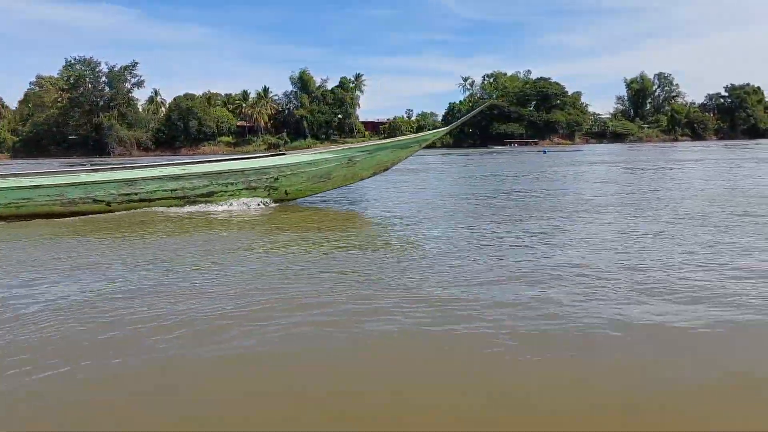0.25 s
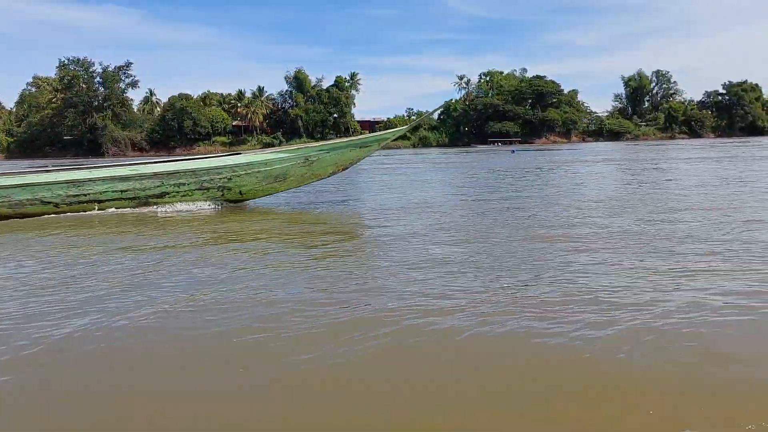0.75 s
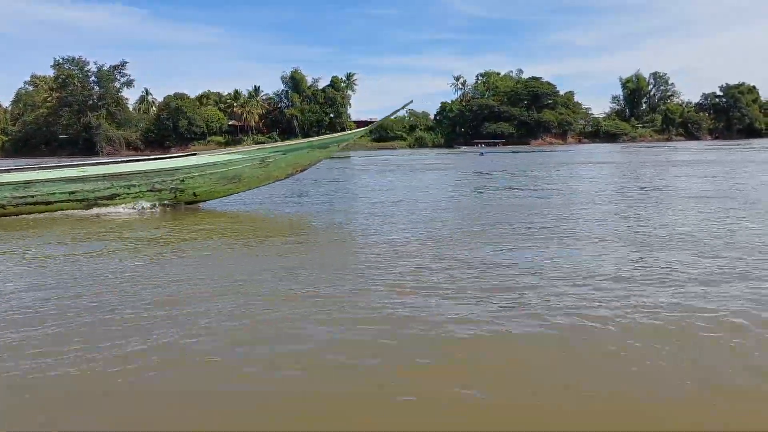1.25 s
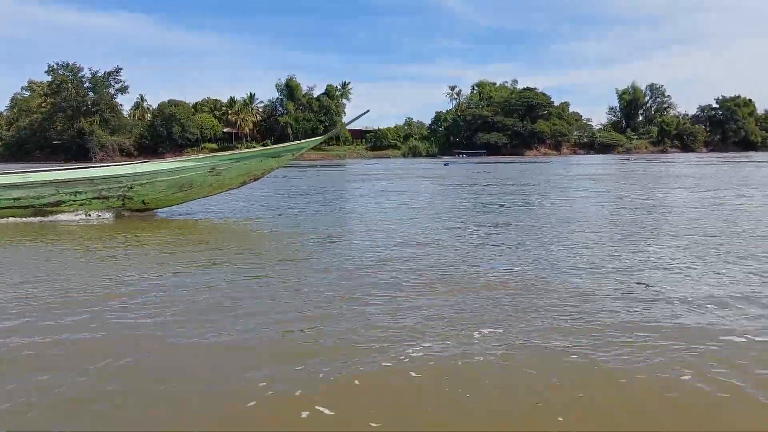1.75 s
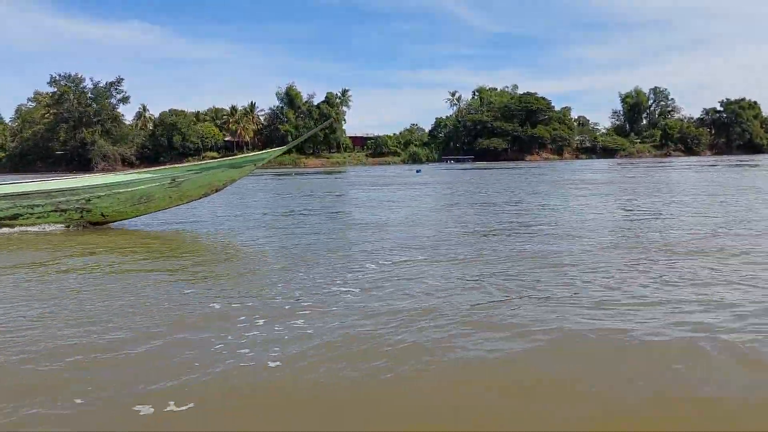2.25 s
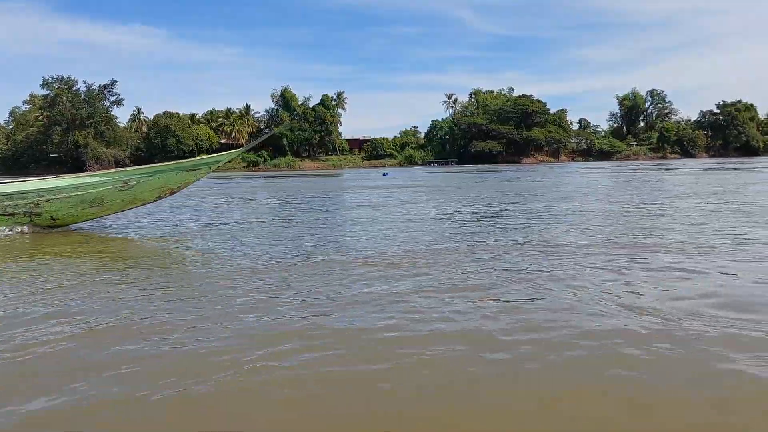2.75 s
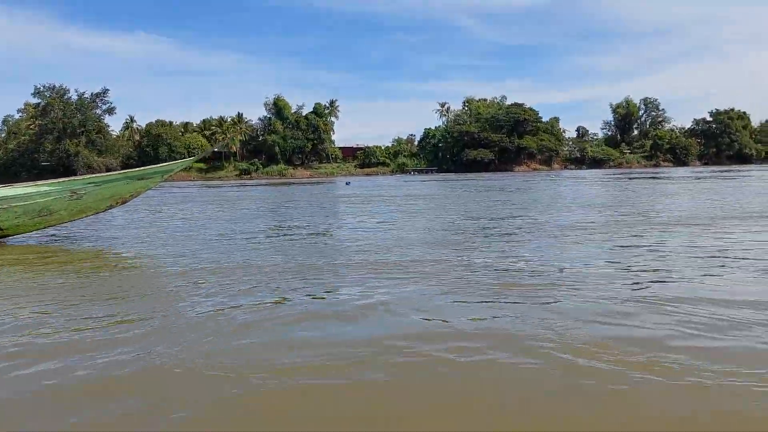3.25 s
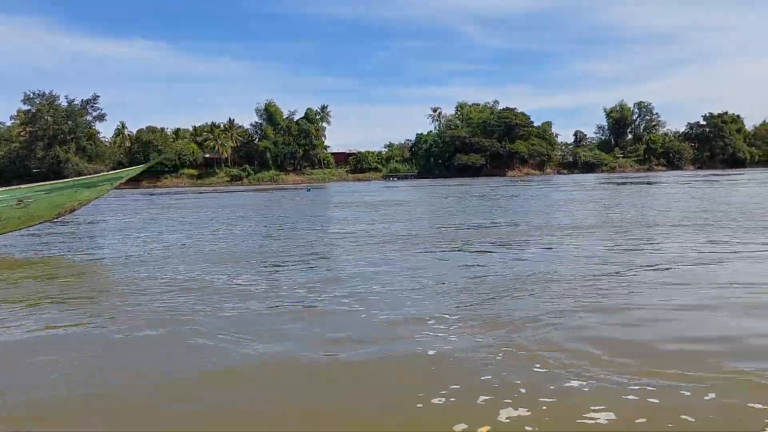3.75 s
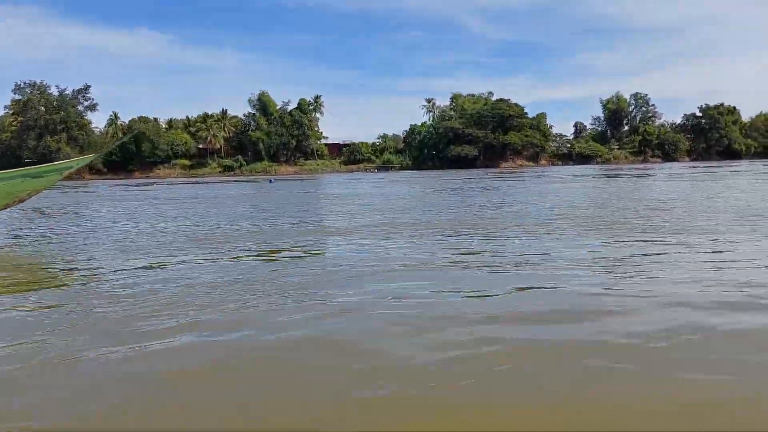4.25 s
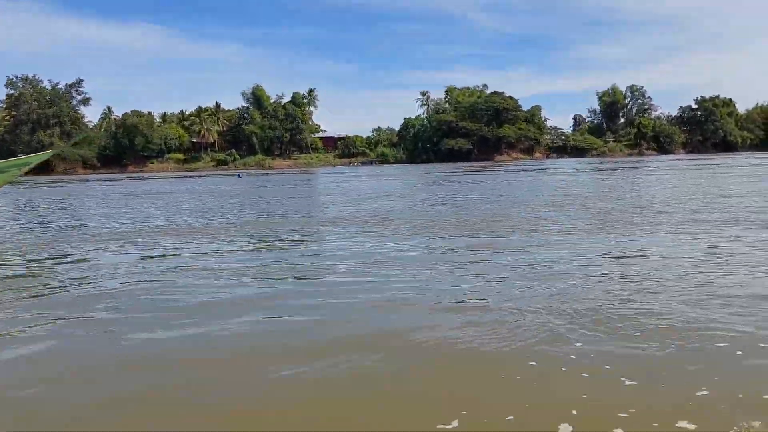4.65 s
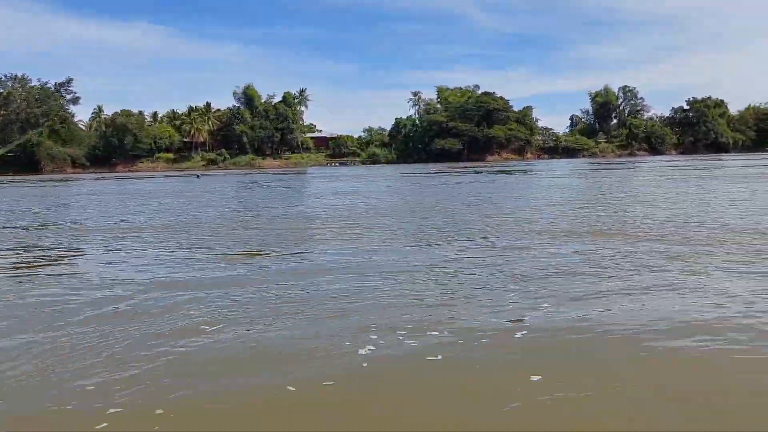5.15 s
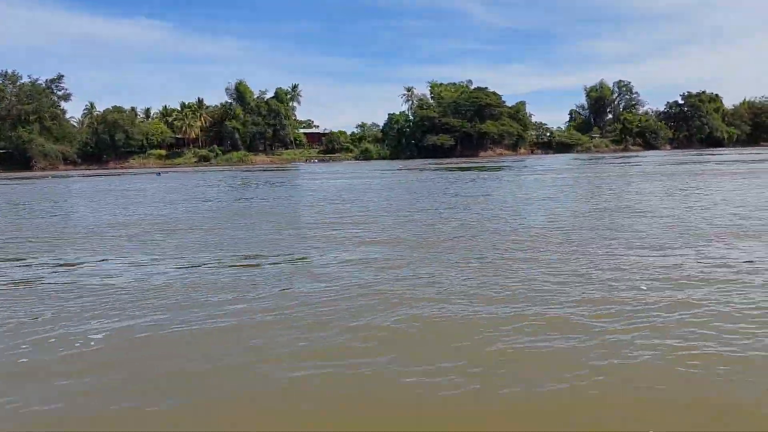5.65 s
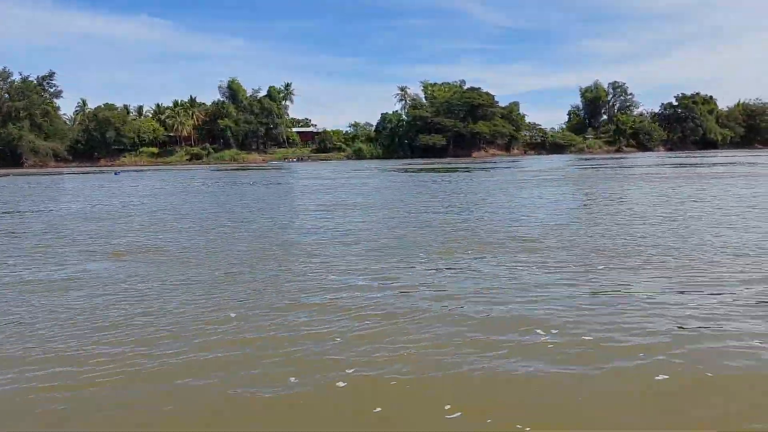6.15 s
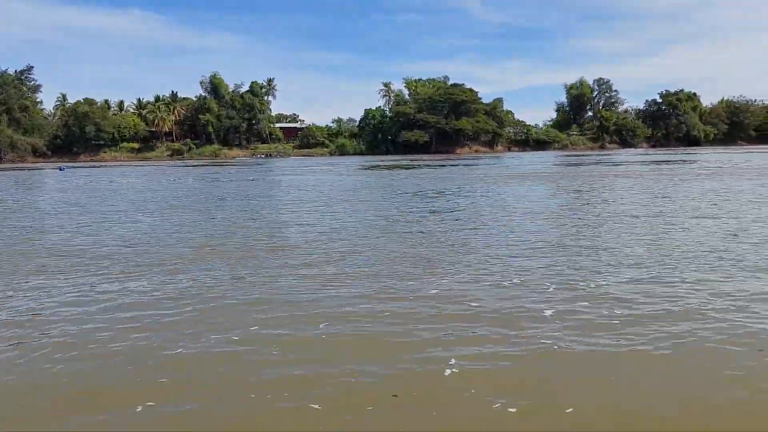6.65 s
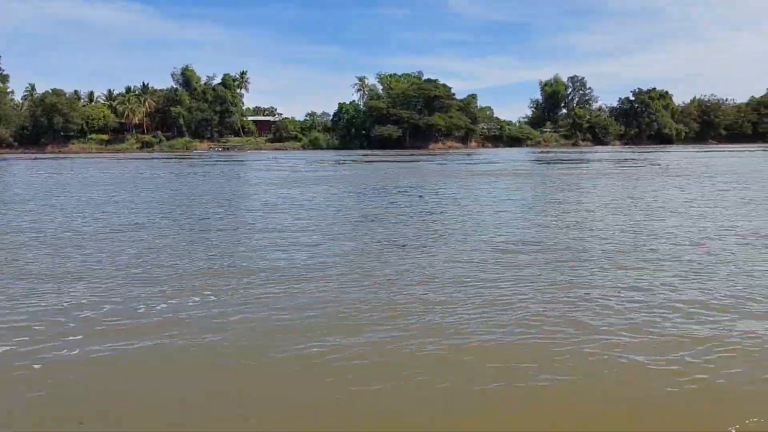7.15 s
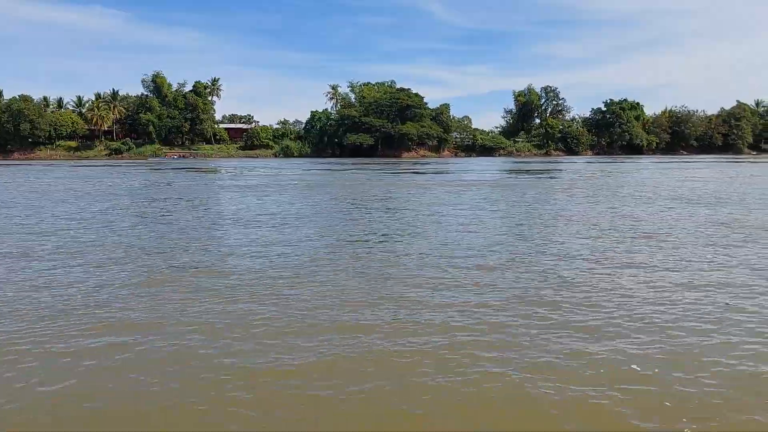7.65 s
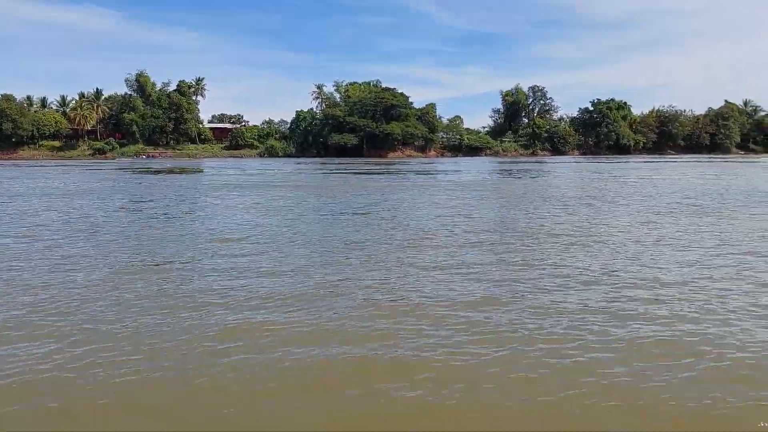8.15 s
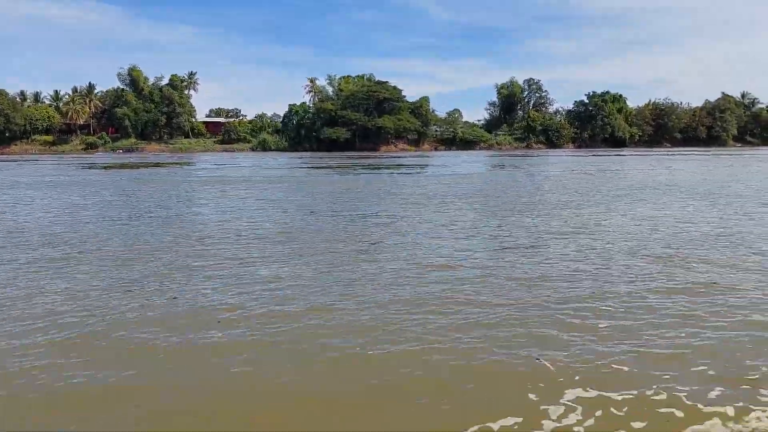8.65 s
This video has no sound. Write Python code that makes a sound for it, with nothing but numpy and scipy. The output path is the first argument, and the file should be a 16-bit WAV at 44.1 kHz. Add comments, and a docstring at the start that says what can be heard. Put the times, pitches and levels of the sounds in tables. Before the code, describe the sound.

For about 9 seconds a small boat engine runs at constant throttle, heard from on board on an open river. A deep, steady exhaust drone, strongest around 84 Hz with higher buzzing overtones, barely wavers. Rapid, slightly uneven piston and valve knocks give a woody, metallic clatter; loose steel rings around 2 kHz, with smaller fittings jingling higher. The rattle flares briefly, as near 1.1, 2.5, 3.75, 5.6 and 7.7 seconds, and drops for instants between. A hiss pulses with the engine, and smooth water wash runs along the hull throughout. Wind buffets the right microphone with low soft thumps: near 0.1, 0.8 and 1.5 seconds, then repeatedly from 3 to 5.2, with a weaker one around 6. After 7 the wind is light, leaving drone, rattle and wash continuing unchanged to the end.

```python
"""A long-tail boat engine runs at constant throttle on a wide river, heard from on board.
Its exhaust drones as sines on crankshaft orders; its contacts are clicks and grit that excite the knock
of the block and casing and the rattle of loose steel, and pulsing noise hisses in the same rhythm.
Shaped noise washes along the hull. The boat reaches the left microphone port first;
lumpy noise and short gusts of headwind buffet the right one."""
import sys
import numpy as np
from scipy import signal
from scipy.fft import rfft, irfft, next_fast_len
from scipy.io import wavfile
from scipy.ndimage import map_coordinates

SR = 44100
rng = np.random.default_rng(int(sys.argv[2]) if len(sys.argv) > 2 else 0)


def generate_wav(signal):
    """Clip the signal to [-1, 1] and save it as 16-bit WAV at the path in sys.argv[1]."""
    frames = np.transpose(np.atleast_2d(signal))
    scaled = np.clip(frames, -1, 1) * 32767
    pcm = np.round(scaled).astype(np.int16)
    wavfile.write(sys.argv[1], SR, pcm)


N = 392490  # length [samples]


def amp(db):
    """Decibels to gain."""
    return 10 ** (np.asarray(db) / 20)


def unit(x):
    """Scale to rms 1."""
    return x / np.sqrt(np.mean(x ** 2) + 1e-20)


def along(points, hz):
    """Read a (frequency [Hz], value) table on a log frequency axis."""
    table_hz, values = np.transpose(points)
    return np.interp(np.log(hz + 1), np.log(table_hz + 1), values)


def over_time(rows):
    """Read a (time [s], value) table at every sample."""
    time_s, values = np.transpose(rows)
    return np.interp(np.arange(N) / SR, time_s, values)


def wobble(rate):
    """A smooth random curve through `rate` random knots a second."""
    knots = rng.standard_normal(int(N * rate / SR) + 4)
    coarse = np.arange(0, N, 32)  # a smooth curve needs only every 32nd sample
    curve = map_coordinates(knots, [coarse * rate / SR + 1])
    return np.interp(np.arange(N), coarse, curve)


def swell(s, width_s):
    """A bell-shaped rise and fall peaking at 1 at time s, down to 1/e^2 width_s away."""
    return np.exp(-2 * ((np.arange(N) / SR - s) / width_s) ** 2)


def filtered(x, response):
    """Multiply the spectrum of x by a response, a function of frequency [Hz]."""
    size = next_fast_len(N + SR // 2)
    hz = np.fft.rfftfreq(size, 1 / SR)
    return irfft(rfft(x, size) * response(hz), size)[..., :N]


def coloured(x, spectrum):
    """Equalize x with a (frequency [Hz], level [dB]) table, at rms 1."""
    return unit(filtered(x, lambda hz: amp(along(spectrum, hz))))


def ringing(x, modes, shift_db):
    """Ring a bank of resonances, at rms 1; the point of contact wanders, so their shares keep shifting."""
    out = np.zeros_like(x)
    for k, (hz, width_hz, db) in enumerate(modes):
        b, a = signal.iirpeak(hz, hz / width_hz, SR)
        drive = x * amp(db + shift_db * np.tanh(wobble(35)))
        out += (-1) ** k * signal.lfilter(b, a, drive)  # neighbours in opposite polarity
    return unit(out)


# likeness of the two ports: (frequency [Hz], left-right correlation [0-1])
PORT_LIKENESS = [(60, 0.6), (300, 0.86), (800, 0.73), (2100, 0.73), (3000, .5), (4200, 0), (6000, 0),
                 (15000, 0.5)]


def spread(direct, scattered):
    """Both ports share the direct sound; the scattered part, opposite in each, sets them apart."""
    def angle(hz):
        return np.arccos(np.clip(along(PORT_LIKENESS, hz), 0, 1)) / 2

    mid = filtered(unit(direct), lambda hz: np.cos(angle(hz)))
    side = filtered(unit(scattered), lambda hz: np.sin(angle(hz)))
    return np.array([mid + side, mid - side])


def noise():
    """White noise spread over the two ports."""
    return spread(*rng.standard_normal((2, N)))


# hull wash spectrum: (frequency [Hz], relative level per Hz [dB])
WASH_SPECTRUM = [(20, -32), (33, -13), (45, 4), (62, -4), (110, 3), (180, -6), (280, 0.5), (450, -4.5),
                 (600, -10), (1000, -8.5), (3000, -23.5), (10000, -35)]


def water():
    """The bow wave washes along the hull as noise of almost steady level."""
    return amp(-28.5) * coloured(noise() * amp(0.66 * wobble(6)), WASH_SPECTRUM)


# headwind before the port's soft overload: (time [s], level [dB])
WIND_LEVEL = [(0, -23), (.4, -30), (.75, -15.5), (1.05, -29), (1.7, -23.5), (2.2, -28.5), (3, -29),
              (3.7, -18.5), (4.35, -25), (4.7, -26), (5.2, -22.5), (6, -23.5), (7.1, -40), (8.1, -31),
              (8.9, -39)]
# single gusts, strong and weak, before the overload:
# (time [s], level [dB], width to 1/e^2 either side [s])
GUSTS = [(0.085, -18, .034), (0.76, -16, 0.039), (1.495, -19.5, 0.065), (2.996, -17.5, .056),
         (3.35, -15, 0.018), (3.677, -18, 0.03), (3.938, -16, .026), (4.11, -21, 0.075),
         (4.485, -18, 0.048), (4.659, -15, 0.061), (4.894, -20, .04), (5.01, -27, .032), (5.128, -14, 0.02),
         (6, -22.5, .09)]
# broad eddies: (frequency [Hz], relative level per Hz [dB])
BROAD_SPECTRUM = [(20, -24), (35, -27), (55, -4.5), (105, 1), (150, -6.5), (220, -5.5), (300, -9.5),
                  (420, -16.5), (600, -27), (1500, -41), (6000, -80)]
# small eddies: (frequency [Hz], relative level per Hz [dB])
SMALL_SPECTRUM = [(100, -6), (250, 1.5), (450, -4), (700, -10), (1000, -18.5), (2000, -44), (8000, -70)]


def wind():
    """Turbulence thumps on the right port; single gusts also bring smaller, brighter eddies."""
    gusts = sum(amp(db) * swell(s, width_s) for s, db, width_s in GUSTS)
    lumps = unit(amp(6.7 * np.tanh(wobble(32))))
    strength = np.hypot(amp(over_time(WIND_LEVEL)) * lumps, gusts)
    broad = strength * coloured(rng.standard_normal((2, N)), BROAD_SPECTRUM)
    small = amp(-5.5) * gusts * coloured(rng.standard_normal((2, N)), SMALL_SPECTRUM)
    # the port overloads softly on the strongest eddies
    ceiling = .48
    overloaded = ceiling * np.tanh((broad + small) / ceiling)
    return overloaded * amp([[-14], [0]])  # the left port is sheltered


# engine treble, shared by the hiss and the small fittings: (time [s], level [dB])
TREBLE_LEVEL = [(0, -28), (1.1, -30.2), (2.6, -29), (4, -30.5), (5.4, -30.5), (7.8, -29), (8.9, -29)]
# rushing gas and valve noise: (frequency [Hz], relative level per Hz [dB])
HISS_SPECTRUM = [(500, 6), (1200, 12.5), (3000, 6), (4600, 2.5), (6000, -4.5), (7600, -4), (9800, -11),
                 (11300, -6), (12500, -5.5), (14000, -12), (15800, -20)]


def hiss(cycles, pulse_db=1.5, edge_db=0.5, stroke_db=.5):
    """Rushing gas and valve noise swell quickly once a turn, more on the power stroke, and ebb slowly."""
    turn = 4 * np.pi * (cycles - .045)  # crank angle [rad]; two turns to a cycle
    surge_db = pulse_db * np.sin(turn) + edge_db * np.sin(2 * turn) - stroke_db * np.sin(turn / 2)
    pulsing = noise() * amp(surge_db + 0.88 * wobble(45))
    return amp(over_time(TREBLE_LEVEL)) * coloured(pulsing, HISS_SPECTRUM)


# contacts in one four-stroke cycle of two turns: (place in the cycle [0-1], relative level [dB])
CONTACTS = [(.07, -8.5), (.16, -3), (.25, -4), (.48, -6), (.6, -7.5), (.68, -3.5), (.75, -6), (.81, -7.5),
            (.97, -5.5)]


def blows(cycles, scatter_s, uneven_db, scrape_s, scrape):
    """Each contact strikes once a cycle, never quite alike, and scrapes briefly afterwards."""
    place, db = np.transpose(CONTACTS)
    when = np.arange(int(cycles[-1]) + 1)[:, None] + place
    at = np.interp(when, cycles, np.arange(N), right=2 * N)
    at = at + scatter_s * SR * rng.standard_normal(when.shape)
    force = amp(db + uneven_db * rng.standard_normal(when.shape))
    inside = (at >= 0) & (at < N)
    taps = np.bincount(at[inside].astype(int), force[inside], N)
    fade = signal.lfilter([1], [1, -np.exp(-1 / (scrape_s * SR))], taps)
    grit = unit(fade * rng.standard_normal((2, N)))
    return spread(unit(taps) + scrape * grit[0], grit[1])


# set rises and one slight dip of the chatter: (time [s], change of level [dB])
SET_CHANGES = [(.23, 2.5), (1.13, 3.5), (1.91, 1), (2.03, 3), (2.52, 3), (3.75, 3.5), (4.39, 2.5),
               (5.58, 3), (6.91, 2.5), (7.5, 1), (7.71, 5), (8.04, 5), (8.23, -1), (8.38, 2.5), (8.79, 3.5)]
# the loose steel settles and the chatter pauses: (time [s], width to 1/e^2 either side [s])
PAUSES = [(1.18, 0.032), (1.375, 0.023), (2.248, 0.017), (2.81, 0.038), (3.47, .015), (3.877, 0.018),
          (3.955, .025), (5.962, 0.041), (6.302, 0.024), (7.164, .025), (7.91, 0.039), (8.136, .035),
          (8.7, .03)]
CHANGE_S = 0.027  # width of a set change, to 1/e^2 either side [s]
PAUSE_DB = -6.5  # depth of a pause [dB]
STRAY_DB, STRAY_PER_S = 2, 42  # chance fits: largest swing [dB], random knots a second


def chatter():
    """Swing of the rattle in dB: chance fits all along, now and then a set change or a pause."""
    set_db = sum(db * swell(s, CHANGE_S) for s, db in SET_CHANGES)
    in_change = sum(swell(s, CHANGE_S) for s, db in SET_CHANGES)
    settled = sum(swell(s, width_s) for s, width_s in PAUSES)
    # chance has its way only between the set changes and the pauses
    free = np.clip(1 - settled - in_change, 0, 1)
    stray_db = STRAY_DB * np.tanh(2 * wobble(STRAY_PER_S))
    return free * stray_db + set_db + PAUSE_DB * settled


# rattling mount before the chatter moves it: (time [s], level [dB])
MOUNT_LEVEL = [(0, -22.5), (1, -23.5), (1.5, -26), (2, -22), (4.2, -23.5), (5.6, -22), (8.9, -22.9)]
# how a blow passes into the mount: (frequency [Hz], relative level [dB])
MOUNT_BLOW = [(600, -32), (1400, -18), (1680, -3), (2350, -3), (2520, -2), (4000, -18), (8000, -38)]
# resonances of the mount: (frequency [Hz], width [Hz], relative level [dB])
MOUNT_MODES = [(1691, 26, -13), (1758, 22, -5), (1808, 28, -6), (1879, 24, -3), (2002, 22, -3),
               (2094, 17, 2), (2219, 24, -5), (2330, 36, -11)]
# how a blow passes into the small fittings: (frequency [Hz], relative level [dB])
FITTING_BLOW = [(1200, -20), (2600, 3.5), (4400, 3.5), (5500, 4), (8000, -34), (15000, -30)]
# resonances of the small engine fittings: (frequency [Hz], width [Hz], relative level [dB])
FITTING_MODES = [(2688, 26, -1), (2948, 36, -2), (3024, 28, -4), (3275, 29, -3), (3712, 60, -5),
                 (3812, 38, 0), (3985, 40, 0), (4162, 30, -1), (4360, 60, -10), (4982, 28, -11)]
JINGLE_DB = -5.5  # small fittings relative to the hiss [dB]


def rattle(cycles, handover_db=2.5):
    """Loose steel chatters in short fits, each part ringing at its own modes."""
    fit_db = chatter()
    mount_hits = blows(cycles, scatter_s=.0004, uneven_db=1.5, scrape_s=0.0031, scrape=0.47)
    fitting_hits = blows(cycles, scatter_s=.0002, uneven_db=2.5, scrape_s=0.0017, scrape=.3)
    mount = ringing(coloured(mount_hits, MOUNT_BLOW), MOUNT_MODES, shift_db=2.5)
    # while the mount rests, the small fittings take the blows
    handover = amp(-handover_db * np.tanh(fit_db / 2))
    fittings = ringing(coloured(fitting_hits, FITTING_BLOW) * handover, FITTING_MODES, shift_db=6.5)
    mount_gain = amp(over_time(MOUNT_LEVEL) + fit_db)
    return mount_gain * mount + amp(over_time(TREBLE_LEVEL) + JINGLE_DB) * fittings


# knock in the block: (frequency [Hz], relative level per Hz [dB])
BLOCK_SPECTRUM = [(150, -14), (280, -4), (470, -8), (600, -6), (750, 1), (880, -7), (1200, -16),
                  (1600, 2.5), (2500, -7.5), (3400, -13), (4500, -15.5), (6000, -31), (12000, -55)]
# resonances of the engine casing: (frequency [Hz], width [Hz], relative level [dB])
CASING_MODES = [(468, 34, -1), (719, 42, 2), (960, 33, -6.5), (1494, 20, 2), (1541, 25, 3.5)]


def knock(cycles):
    """Piston and valve gear knock in the block and ring the casing."""
    block_hits = blows(cycles, scatter_s=.0011, uneven_db=1.5, scrape_s=0.0035, scrape=1.55)
    casing_hits = blows(cycles, scatter_s=.0005, uneven_db=3, scrape_s=0.0034, scrape=0.92)
    block = coloured(block_hits, BLOCK_SPECTRUM)
    casing = ringing(casing_hits, CASING_MODES, shift_db=3.0)
    return amp(-33.5) * block + amp(-32.5) * casing


# exhaust orders: (multiple of the shaft speed, relative level [dB])
EXHAUST_ORDERS = [(1, -18.5), (1.5, -19), (2, .5), (2.5, -20), (3, -11.5), (3.5, -20.5), (4, -18), (5, -19),
                  (5.5, -24.5), (6, -15.5), (6.5, -26), (7, -18.5), (7.5, -27), (8, -25.5), (9, -14),
                  (9.5, -31.5), (10, -29.5), (11, -22), (11.5, -25), (12, -28.5), (16, -33), (18, -22.5),
                  (20, -27)]


def exhaust(cycles, flutter=0.047, high_flutter=0.23):
    """Clean shaft orders, at rms 1; the weak ones waver more than the strong ones."""
    drone = np.zeros(N)
    for multiple, db in EXHAUST_ORDERS:
        waver = flutter + high_flutter * (1 - amp(min(db, 0) / 2))
        phase = 4 * np.pi * multiple * cycles + 2 * np.pi * rng.random()
        loudness = amp(db) * (1 + waver * wobble(12))
        drone += loudness * np.sin(phase + waver * wobble(9))
    return unit(drone)


# exhaust drone: (time [s], level [dB])
DRONE_LEVEL = [(0, -18), (3.5, -18.5), (4.4, -20), (5.2, -19), (8.9, -18)]
SHAFT_HZ = 41.93  # central crankshaft speed [turns/s]


def engine():
    """All of the engine follows one slightly unsteady shaft."""
    unsteady = 1 + .0004 * wobble(3) + .001 * wobble(20)
    cycles = np.cumsum(SHAFT_HZ / 2 * unsteady) / SR  # four-stroke cycles of two turns
    drone = amp(over_time(DRONE_LEVEL)) * exhaust(cycles)
    return drone + knock(cycles) + rattle(cycles) + hiss(cycles)


# balance of the boat's sound between the ports: (frequency [Hz], left over right [dB])
PORT_BALANCE = [(84, -2), (126, -8.5), (165, 1), (250, -6.5), (300, 4), (380, -1), (730, 1.5), (1800, -1),
                (2100, -0.5), (2600, 3.5), (4000, 0), (5200, 4), (8000, 2), (12000, -1.5)]


def scene():
    """Sound from the stern reaches the left port first; the wind acts on the ports themselves."""
    lead_s = .00045
    side = np.array([[.5], [-.5]])  # each port takes half of the difference

    def ports(hz):
        return amp(side * along(PORT_BALANCE, hz)) * np.exp(2j * np.pi * hz * lead_s * side)

    return filtered(engine() + water(), ports) + wind()


TOP_HZ = 15850  # band limit [Hz]


def record(dry):
    """Keep nothing at or above the band limit."""
    return filtered(dry, lambda hz: hz < TOP_HZ)


dry = scene()
out = record(dry)
generate_wav(out)
```